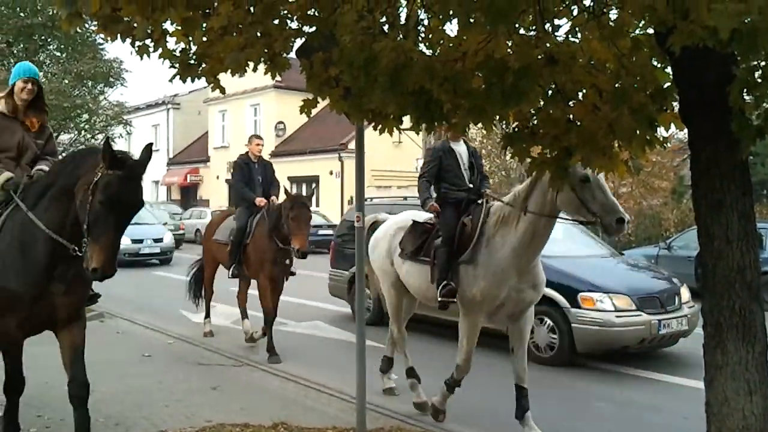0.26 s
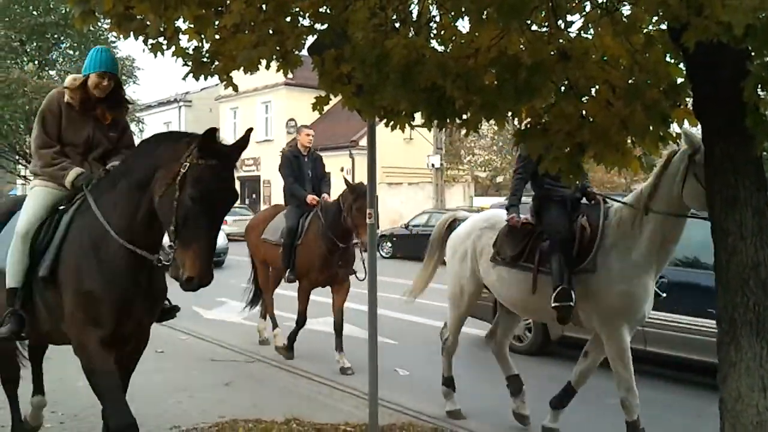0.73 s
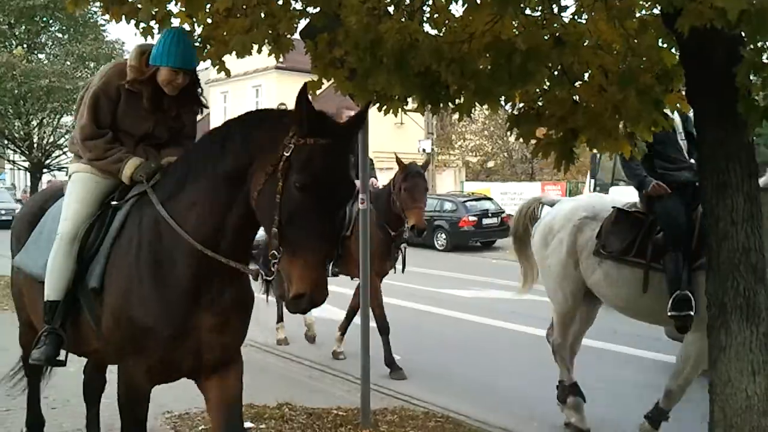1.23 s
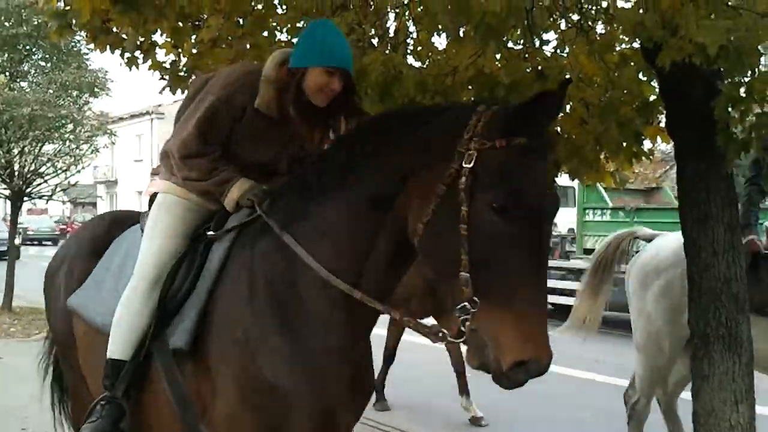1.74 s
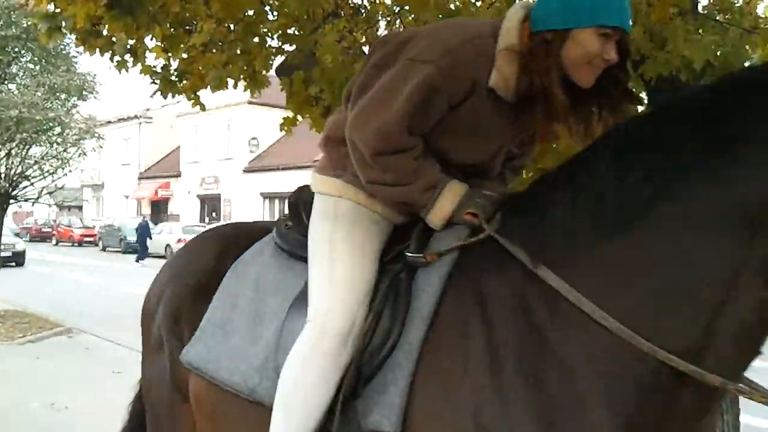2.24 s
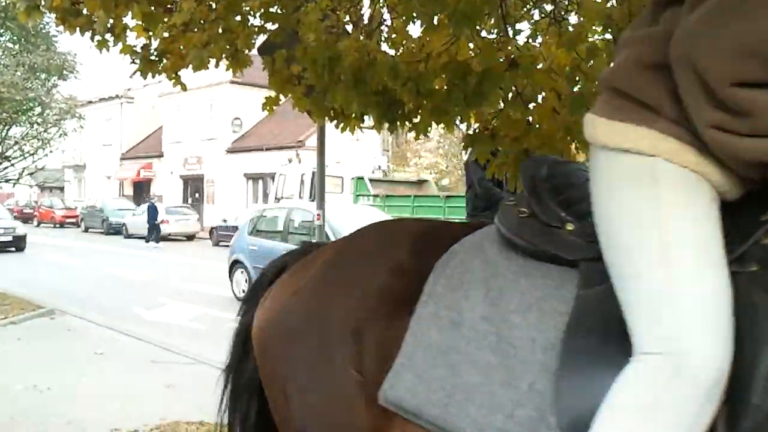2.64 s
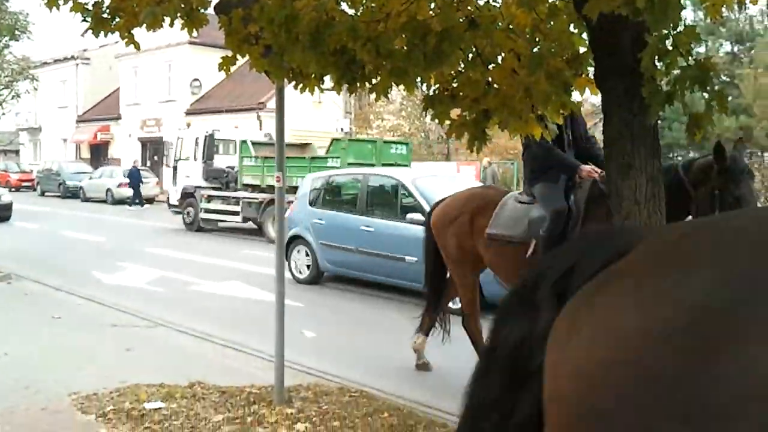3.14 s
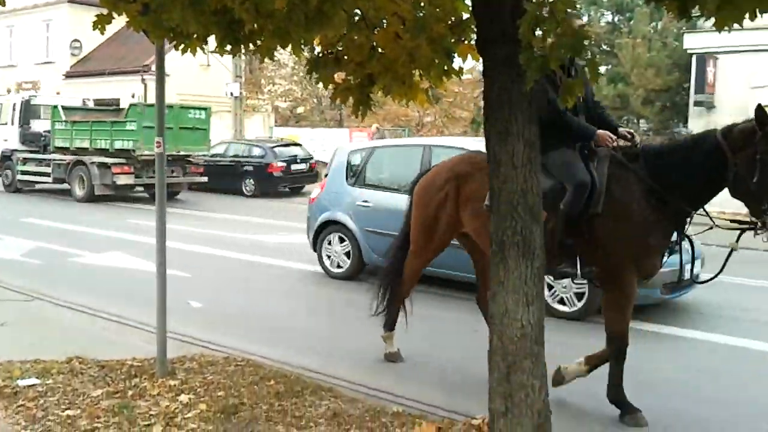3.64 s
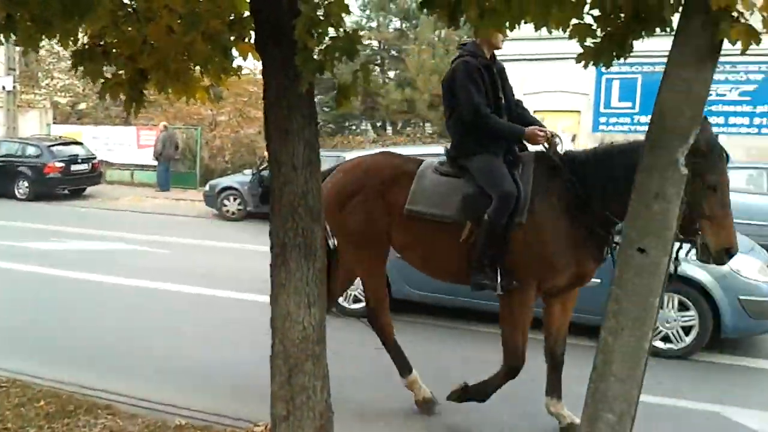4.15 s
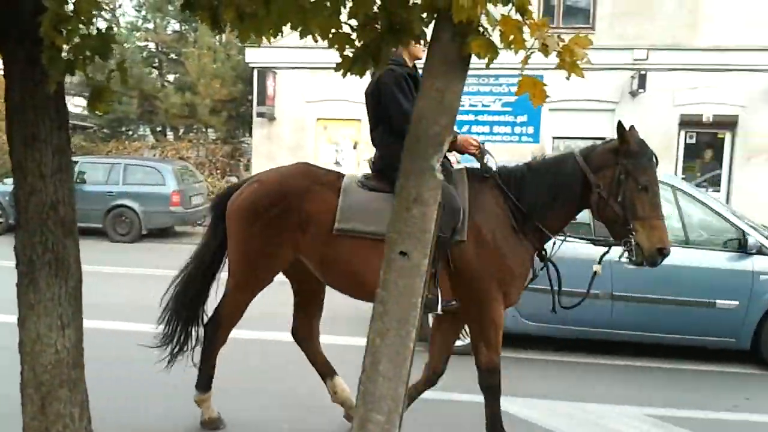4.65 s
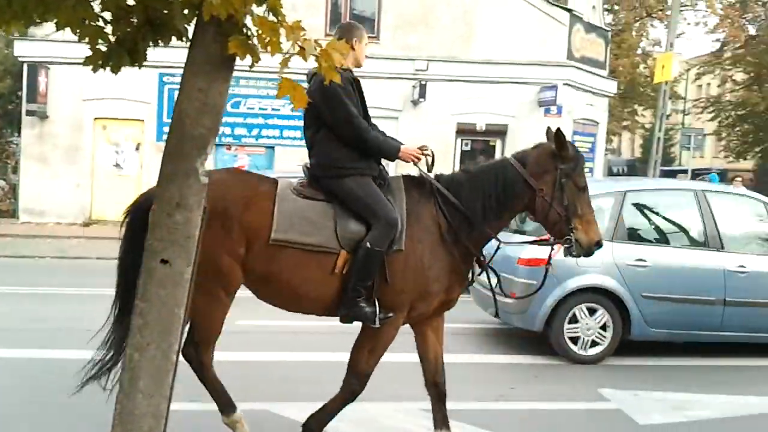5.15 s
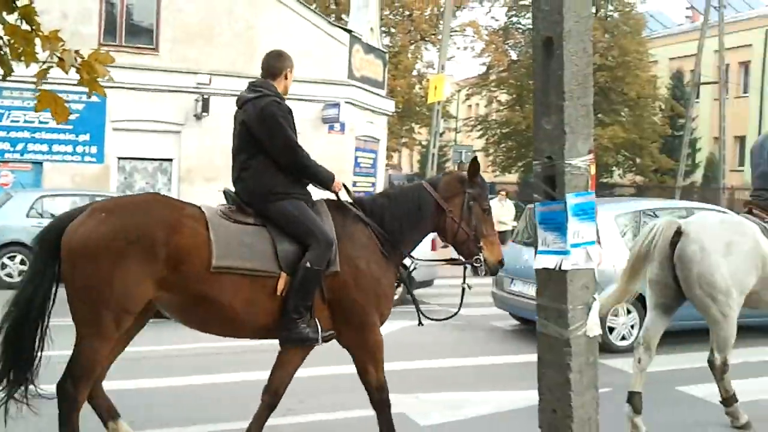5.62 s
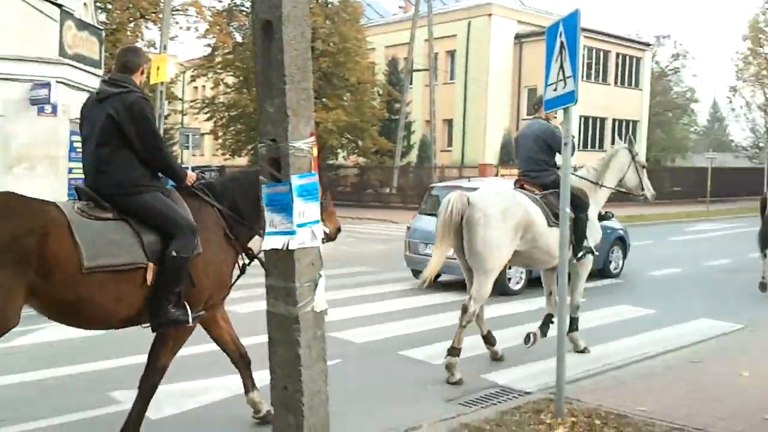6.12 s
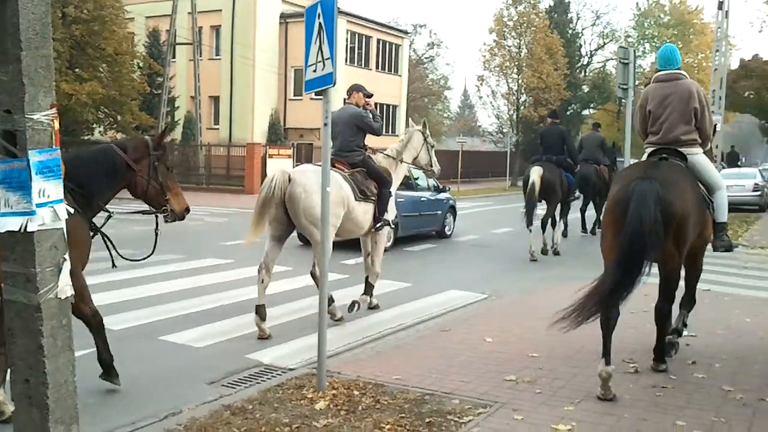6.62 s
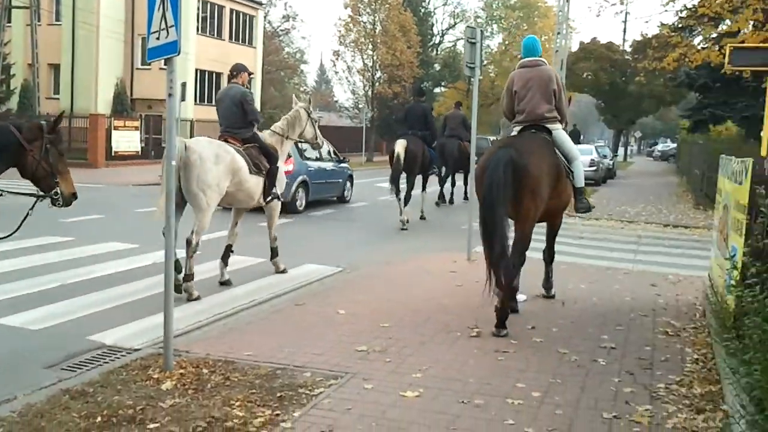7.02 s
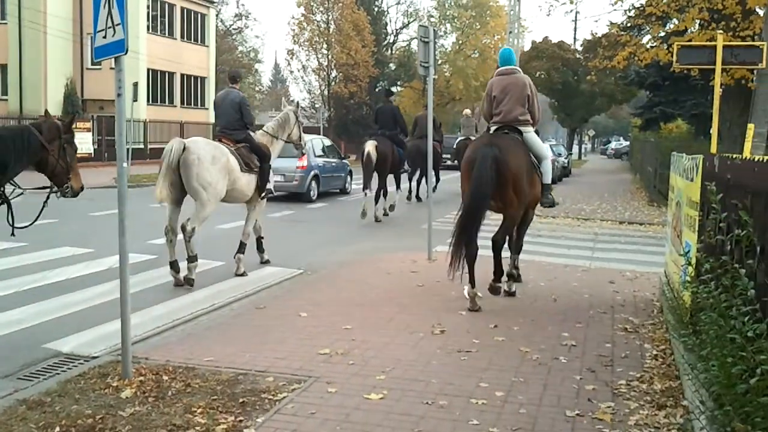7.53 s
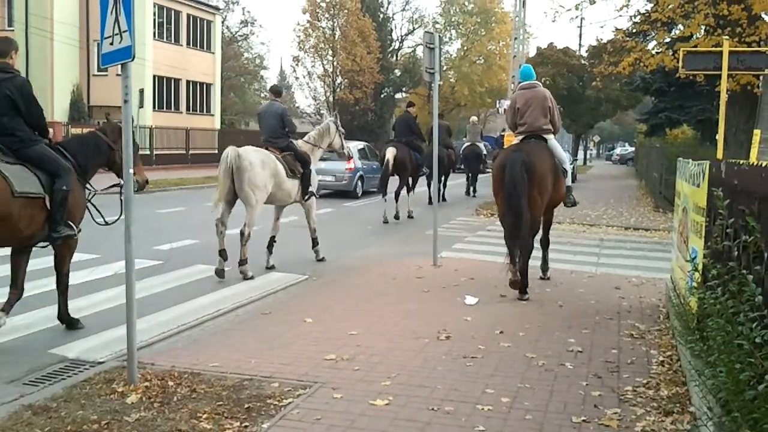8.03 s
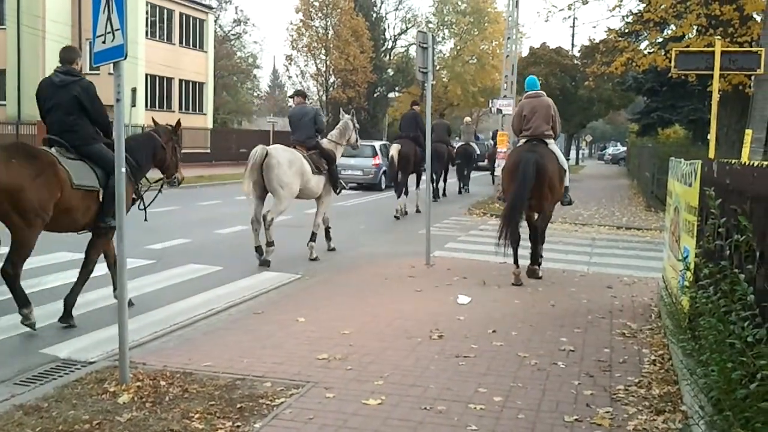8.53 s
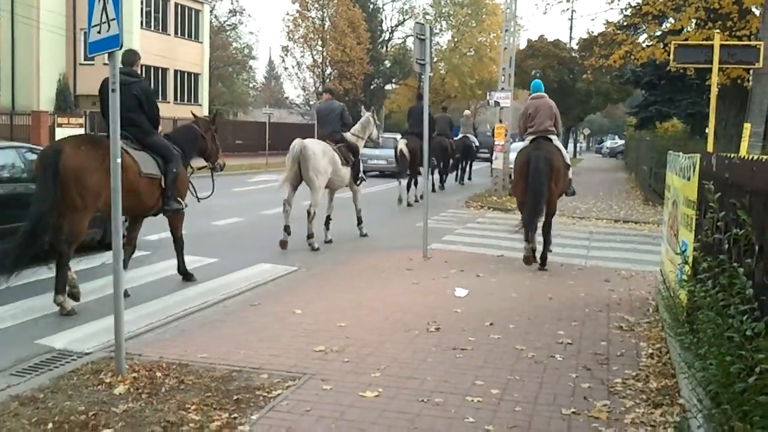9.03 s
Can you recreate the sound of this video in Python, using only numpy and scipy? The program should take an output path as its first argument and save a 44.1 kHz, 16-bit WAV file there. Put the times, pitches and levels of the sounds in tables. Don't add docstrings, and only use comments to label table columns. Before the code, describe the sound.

Several shod horses clop unevenly along a paved town street, close at first, then thinning into the distance over a low rumble of traffic.

```python
import sys
import numpy as np
from scipy import signal
from scipy.fft import rfft, irfft, next_fast_len
from scipy.io import wavfile
from scipy.ndimage import uniform_filter1d

SR = 44100
rng = np.random.default_rng(int(sys.argv[2]) if len(sys.argv) > 2 else 0)


def ratio_of_db(decibels):
    return 10 ** (np.asarray(decibels, float) / 20)


def output_pcm(signal):
    pcm = np.clip(np.atleast_2d(signal).T, -1, 1) * 32767
    wavfile.write(sys.argv[1], SR, np.round(pcm).astype(np.int16))


N = 408807
TIME = np.arange(N) / SR


def in_time(rows):
    s, *columns = np.transpose(rows)
    return [np.interp(TIME, s, c) for c in columns]


def band(x, low_hz, high_hz, order=2):
    return signal.sosfilt(signal.butter(order, [low_hz, high_hz], "band", fs=SR, output="sos"), x)


def steep_low(x, edge_hz):
    return signal.sosfilt(signal.butter(9, edge_hz, fs=SR, output="sos"), x)


def peak_one(rows):
    return rows / np.max(np.abs(rows), axis=1, keepdims=True)


def drift(rate_hz):
    hop = 100
    r = np.exp(-2 * np.pi * rate_hz * hop / SR)
    white = rng.standard_normal(N // hop + 1002)
    slow = signal.lfilter([1], [1, -2 * r, r * r], white)[1000:]
    return np.interp(np.arange(N) / hop, np.arange(len(slow)), slow / slow.std())


def place(times_s, rows):
    out = np.zeros(N + rows.shape[1])
    for s, row in zip(times_s, rows):
        out[round(s * SR):][:len(row)] += row
    return out[:N]


def ring(x, hz, t60_s):
    r = ratio_of_db(-60 / (t60_s * SR))
    w = 2 * np.pi * hz / SR
    return signal.lfilter([0, np.sin(w)], [1, -2 * r * np.cos(w), r * r], x)


def ragged(count, t60_s):
    t = np.arange(round(.08 * SR)) / SR
    luck = np.array([rng.standard_normal((2, len(t))) for _ in range(count)])
    clumps = uniform_filter1d(luck[:, 1], size=60, axis=1) * np.sqrt(60)
    return luck[:, 0] * ratio_of_db(6.7 * clumps) * np.exp(-np.log(1000) * t / t60_s)


def coloured_noise(spectrum, patchy_db):
    size = next_fast_len(N)
    hz = np.fft.rfftfreq(size, 1 / SR)[1:]
    at_hz, level_db = np.transpose(spectrum)
    shape = ratio_of_db(np.interp(np.log(hz), np.log(at_hz), level_db, left=-90, right=-90))
    white = rfft(rng.standard_normal(size))[1:] * shape
    octave = np.log2(hz / at_hz[0])
    out = 0
    for centre in np.arange(0, np.log2(at_hz[-1] / at_hz[0]) + 1):
        part = np.cos(np.pi / 2 * np.clip(octave - centre, -1, 1)) ** 2
        out = out + irfft(np.append(0, white * part), size)[:N] * ratio_of_db(patchy_db * drift(6))
    return out / out.std()


def traffic():
    # frequency in Hz, level in dB per Hz
    rumble = [(13, -32.5), (22, -9), (38, 0.5), (59, -1.5), (97, -3.5), (215, -9.5), (400, -19), (520, -49),
              (880, -120)]
    drone = [(180, -11), (300, 1.5), (512, 2), (650, -3.5), (939, -3), (1400, -16), (1820, -52.5),
             (3080, -120)]
    tyres = [(650, -16.5), (1100, 2), (1660, 0.5), (2100, -8), (2570, -7), (3050, -20), (3960, -51),
             (6710, -120)]
    hiss = [(2900, 1), (3400, 0.5), (3900, -3), (4400, -1.4), (5500, -3), (6600, -5), (7600, -6), (8300, 8),
            (8800, -6.5)]
    # steady level in dB, share of the passing roar in dB, patchiness in dB
    layers = [
        (-30.5, -8.5, 1.1),
        (-40.5, 0.5, 1.96),
        (-53, 0.5, 1.04),
        (-64, -29, 1.07),
    ]
    # time abreast in s, time to draw half away in s, tyre roar in dB
    passes = [
        (0.952, 0.23, -46),
        (2.2, 0.57, -50.5),
        (4.3, 0.33, -44.5),
        (5.95, 0.41, -41),
        (7.601, 1.1, -45.5),
        (9.05, 0.18, -48.5),
    ]
    # centre in s, half length in s, depth in dB
    dips = [
        (1.45, 0.19, -2),
        (3.202, 0.29, -3.5),
        (8.693, 0.13, -2.5),
    ]
    roar = sum(ratio_of_db(db) ** 2 / (1 + ((TIME - s) / half_s) ** 2) for s, half_s, db in passes)
    dip_gain = ratio_of_db(sum(db * np.exp(-((TIME - s) / half_s) ** 2) for s, half_s, db in dips))
    out = 0
    for colour, (steady_db, share_db, patchy_db) in zip((rumble, drone, tyres, hiss), layers):
        level = np.sqrt(ratio_of_db(steady_db) ** 2 + ratio_of_db(share_db) ** 2 * roar)
        out = out + level * coloured_noise(colour, patchy_db)
    return dip_gain * out


def near_car():
    # frequency in Hz, level in dB per Hz
    fan_spectrum = [(950, -13.5), (1150, 0), (1350, -8), (1550, -14.5), (1680, -4), (1850, -19.5),
                    (2500, -15.5), (2900, -26)]
    spray_spectrum = [(4000, -22), (4400, 1.5), (5500, -0.5), (6500, -13)]
    # time abreast in s, half length in s, fan in dB, spray in dB
    abreast = [
        (3.647, 0.57, -44, -88),
        (4.355, 0.35, -46, -74),
        (5.897, 0.3, -60, -70.5),
        (9.0, 0.3, -63, -77),
    ]
    s, half_s, fan_db, spray_db = np.transpose(abreast)[:, :, None]
    close = np.exp(-((TIME - s) / half_s) ** 2)
    fan = np.sqrt(np.sum(ratio_of_db(fan_db) ** 2 * close, axis=0))
    spray = np.sqrt(np.sum(ratio_of_db(spray_db) ** 2 * close, axis=0))
    return fan * coloured_noise(fan_spectrum, patchy_db=3.0) + spray * coloured_noise(spray_spectrum, patchy_db=0.0)


def bumps():
    # time in s, peak in dB, pitch in Hz, t60 in s
    seams = [
        (7.171, -21.5, 123.5, 0.18),
    ]
    s, peak_db, hz, t60_s = np.transpose(seams)[:, :, None]
    t = np.arange(round(.3 * SR)) / SR
    modes = np.sin(2 * np.pi * hz * t) + 0.7 * np.sin(2 * np.pi * 1.1 * hz * t)
    knock = modes * (1 - np.exp(-t / .012)) * np.exp(-np.log(1000) * t / t60_s)
    return place(s[:, 0], ratio_of_db(peak_db) * peak_one(knock))


def engine(rows, orders, wobble_db):
    hz, level_db, *load_db = in_time(rows)
    phase = 2 * np.pi * np.cumsum(hz * (1 + 0.002934 * drift(4.42))) / SR
    fade_in = np.clip((TIME - rows[0][0]) / 0.046, 0, 1)
    fade_out = np.clip((rows[-1][0] + 0.056 - TIME) / 0.054, 0, 1)
    tones = 0
    for k, db in orders:
        lift_db = (k > 1) * sum(load_db)
        order_db = level_db + db + lift_db + wobble_db * np.sqrt(k) * drift(10.0)
        tones = tones + ratio_of_db(order_db) * np.sin(k * phase + k)
    return np.sqrt(2) * fade_in * fade_out * tones


def lorry():
    # time in s, gear whine in Hz, level in dB
    easing = [
        (0, 202.5, -40.5),
        (.5, 198.2, -39),
        (.9, 189.9, -33),
        (1.15, 191.4, -41),
        (1.4, 194.7, -39.5),
        (1.8, 199, -37.5),
        (2.2, 202.2, -38),
        (2.7, 196.3, -43.5),
    ]
    # multiple of the whine, level in dB
    gears = [(1, -7), (1.085, -3)]
    # frequency in Hz, level in dB per Hz
    boom = [(160, -31), (190, 4.5), (215, 4), (260, 0.5), (310, 1.5)]
    whine = engine(easing, gears, wobble_db=3.5)
    passing = np.clip((easing[-1][0] + 0.39 - TIME) / 0.33, 0, 1)
    return whine + passing * ratio_of_db(in_time(easing)[1]) * coloured_noise(boom, patchy_db=-3.0)


def cars():
    # time in s, firing rate in Hz, level in dB, load lift of the upper orders in dB
    pulling = [(2.7, 41.3, -35, -11), (3.05, 44.6, -20.5, -7.5), (3.7, 49.15, -23.5, 2.5),
               (4.3, 53.16, -24, 1.5), (4.8, 57.12, -22.5, -6), (5.2, 60.3, -25, 2.5), (5.5, 62.8, -24, -9),
               (5.66, 65, -39, -2), (6.05, 68.6, -29.5, -9.5), (6.43, 72.4, -34.5, -10),
               (6.52, 73.2, -25.5, -17), (7.4, 82, -30.5, -9.5), (8.0, 88.84, -31.5, -13),
               (8.32, 91.3, -31, -11), (8.55, 93.25, -25.5, -3.5), (8.82, 96.2, -34, -4),
               (9.05, 98.3, -30.5, -3), (9.27, 100.9, -25.5, -7)]
    creeping = [(1.6, 36.75, -41, 1), (1.95, 37.9, -33, 2), (2.6, 39.58, -28, -3.5),
                (3.1, 40.46, -24.5, -9.5), (4.2, 41.9, -38, -2), (5, 45.1, -33.5, -0.5),
                (5.45, 48.07, -31.5, -1.5), (6.1, 45.63, -31.5, -0.5), (6.6, 46.15, -31, 4.5),
                (7.1, 47.73, -34, 4.5), (7.7, 50.3, -29.5, 1), (8.2, 50.72, -40, 0),
                (9.27, 50.24, -36.5, 8.5)]
    # time in s, firing rate in Hz, level in dB
    slowing = [
        (0.0, 47.35, -31.5),
        (0.35, 46.34, -24.5),
        (0.95, 46.72, -31),
        (1.1, 46.4, -21),
        (1.5, 45.85, -22),
        (1.7, 44.84, -35.5),
        (1.95, 44.9, -33.5),
        (2.25, 44.2, -44),
    ]
    idling = [
        (4.6, 38.5, -34),
        (5.2, 37.91, -43),
        (5.5, 36.48, -41),
        (5.9, 35.6, -28.5),
        (6.36, 36.83, -28.5),
        (7.42, 38.27, -31.5),
        (7.98, 39.03, -26.5),
        (8.7, 39.88, -31),
        (9.27, 41.5, -30.5),
    ]
    # multiple of the firing rate, level in dB
    pulling_orders = [(1, 0), (2, -14), (3, -21.5), (5, -23)]
    creeping_orders = [(1, 0), (2, -14.5), (4, -11.5), (5, -17.5), (7, -22)]
    out = engine(pulling, pulling_orders, wobble_db=0.6)
    out += engine(slowing, [(1, 0)], wobble_db=0.3)
    out += engine(creeping, creeping_orders, wobble_db=-0.65)
    out += engine(idling, [(1, 0.5), (2, -15.5)], wobble_db=3.3)
    return out


def street(x):
    # delay in s, level in dB
    echoes = [(.0035, -24), (.007, -28), (.017, -21), (.031, -22), (.052, -27), (.083, -25)]
    tail = np.zeros(round(.12 * SR))
    for delay_s, db in echoes:
        smear = rng.standard_normal(90) * np.hanning(90)
        tail[round(delay_s * SR):][:90] += ratio_of_db(db - 4.0) * smear
    return signal.fftconvolve(x, band(tail, 210, 2800))[:N]


def grit():
    # time in s, peak in dB, shoe ring in Hz, lower edge in dB
    scrapes = [(0.098, -54, 4470, 8), (0.1186, -45, 5600, 18.5), (0.128, -53, 5540, 6),
               (0.18, -56, 3650, 4), (0.377, -47, 4300, 10), (0.392, -40, 6440, -14),
               (0.403, -51, 4280, 9), (0.6338, -41.5, 4250, 6), (0.643, -54, 7000, 8),
               (0.914, -46, 5800, -6), (0.921, -45, 4700, 3), (1.1596, -50.5, 3870, -2.5),
               (1.435, -48, 3610, 6), (1.4504, -45, 5310, 4), (1.454, -44, 2570, 10.5),
               (1.4645, -45, 2450, 4), (1.472, -63, 4500, 6), (1.481, -50, 3930, -10),
               (1.673, -43, 3700, -10), (1.84, -55, 4500, 18), (1.8951, -54, 3920, 5),
               (1.947, -53, 4380, -4), (2.0066, -52, 6100, 0), (2.192, -44, 3687, -14),
               (2.4593, -49, 4270, -5.5), (2.4915, -42.5, 5530, -13), (2.509, -49, 4220, -7),
               (2.705, -49, 4536, -3), (2.957, -48.5, 4200, -1), (3.023, -48, 3564, -4),
               (3.211, -51, 3850, 10), (3.445, -52.5, 4050, 6), (3.546, -48.5, 4400, -7),
               (3.7065, -52, 3646, 3), (3.9237, -51, 5530, 7), (5.016, -62, 3820, 27),
               (5.2473, -58, 3100, 11), (5.5952, -55, 5900, 1), (5.6303, -46.5, 3200, 5),
                   (5.786, -51, 5906, 4), (6.5906, -50, 3050, 12), (6.7084, -44, 3100, 9),
                   (6.926, -53, 2950, 13), (6.987, -46, 2940, 7), (7.151, -57, 3300, 9),
                   (7.373, -42, 3110, 0), (7.55, -56, 3100, 9), (7.763, -44, 3370, 7),
                   (7.779, -48, 3212, 3), (8.1369, -44.5, 3314, 5), (8.244, -57, 4200, 12),
                   (8.308, -50, 3400, 6), (8.317, -54, 4500, 11), (8.3869, -62, 2900, 18),
                   (8.514, -48, 3020, 11), (8.684, -55, 4600, -2), (8.802, -49, 3138, 8),
                   (9.023, -57, 6200, -3), (9.048, -52, 7225, -2), (9.2262, -53, 7340, -11)]
    s, peak_db, hz, lower_db = np.transpose(scrapes)[:, :, None]
    grains = ragged(len(s), t60_s=.038)
    t = np.arange(grains.shape[1]) / SR
    grains = grains * (1 - np.exp(-t / .0008))
    shoe = np.array([ring(row, f, t60_s=.007) for row, f in zip(grains, hz[:, 0])])
    bright = peak_one(peak_one(band(grains, 3900, 7800)) + ratio_of_db(3.0) * peak_one(shoe))
    first_tick = peak_one(band(grains * np.exp(-t / 0.0013), 3300, 8300))
    bright += ratio_of_db(-5) * first_tick
    lower = peak_one(steep_low(band(grains, 1500, 5700), 2830))
    return place(s[:, 0], ratio_of_db(peak_db + 0.5) * (bright + ratio_of_db(lower_db + 2.0) * lower))


def hooves():
    # time in s, peak in dB,
    # hollow pitch in Hz, clack in dB re peak
    heel_falls = [(.041, -17, 880, -27), (.361, -20, 1045, -26), (0.403, -18, 940, -22),
                  (.624, -15.5, 990, -20), (0.821, -23.5, 1070, -25), (0.9, -28, 1060, -23),
                  (1.409, -21.5, 850, -24), (1.621, -25.5, 920, -27), (1.701, -23, 890, -20),
                  (2.125, -20.5, 1050, -9), (2.238, -17.5, 1030, -12), (2.311, -17.5, 744, -38),
                  (2.39, -18.5, 880, -24), (2.832, -17, 440, -9.5), (4.07, -20.5, 1120, -27),
                  (4.575, -20.5, 930, -9), (4.637, -21, 820, -10), (5.11, -23, 990, -30),
                  (6.634, -23, 910, -23), (8.303, -22, 1073, -27)]
    flat_falls = [(0.097, -20, 965, -27), (1.224, -24, 866, -23), (1.333, -22, 1230, -3.5),
                  (1.486, -16, 920, -37), (1.728, -24, 757, -9), (1.888, -24.5, 1070, -30),
                  (2.492, -14, 660, -35), (2.51, -11, 930, -36), (2.587, -18, 860, -22),
                  (2.955, -15, 721, -26), (3.212, -19.5, 755, -21), (3.279, -26.5, 900, -23),
                  (3.543, -16, 990, -29), (3.706, -22, 825, -9), (4.423, -22.5, 606, -7),
                  (4.717, -20.5, 875, -12), (6.674, -27, 1010, -5), (7.376, -21.5, 694.8, -8),
                  (8.319, -19.5, 779.6, -11), (8.604, -25.5, 1099, -28), (8.804, -25, 886, -14),
                  (8.91, -27, 822, -11)]
    cupped_falls = [(.121, -15, 706, -23), (.392, -10, 954, -18), (.394, -13.5, 582, -36),
                    (.432, -19.5, 810, -33), (.596, -24.5, 696, -1.5), (1.153, -17.5, 864, -10),
                    (1.433, -15.5, 748.4, -18), (1.949, -12, 717, -38), (2.248, -18, 965, -32),
                    (2.702, -14.5, 750, -10), (2.753, -19.5, 960, -11), (3.022, -16, 950, -18),
                    (3.319, -23.5, 1360, -10), (3.443, -16.5, 745, -20), (5.596, -17, 854, -13),
                    (5.773, -21, 1000, -15), (6.099, -24, 970, -12), (6.174, -21, 634, -8),
                    (6.933, -21, 1110, -9), (7.151, -25, 1021, -5), (9.22, -23.5, 920, -20)]
    toes = [(.115, -18, 1006, -14), (.127, -20, 770, -22), (.324, -28, 1260, -1), (0.376, -30, 930, -4),
            (.646, -29.5, 905, -34), (1.449, -27.5, 1220, 1.5), (1.938, -25, 970, -22),
            (2.282, -23, 915, -26), (2.334, -32, 1470, 5), (2.611, -20.5, 1486, -8), (.479, -41, 965, -19),
            (0.664, -29, 1130, -8), (.718, -31, 1130, -10), (1.026, -27, 1045, -11), (2.08, -29, 810, -5),
            (2.821, -27.5, 1252, -3.5), (7.555, -28.5, 981.8, 0.5), (8.13, -28, 950, -14),
            (8.385, -33, 1250, 7.5), (8.553, -26.5, 953, -9)]
    # thud in dB re peak, ring t60 in s
    landings = [
        (-5, .015),
        (-13, .016),
        (-17, .017),
        (-21, .02),
    ]
    # time in s, peak in dB, hollow pitch in Hz, clack in dB re peak,
    # ring t60 in s
    hard_falls = [(0.629, -27, 1100, -11, 0.013), (0.6342, -17, 990, -7, .011),
                  (0.639, -24, 1220, 3.5, 0.0081), (0.9134, -12, 886, -12.5, 0.016),
                  (.9197, -27, 985, -8, 0.013), (1.668, -22, 1148, -18, 0.01),
                  (1.6733, -10, 850, -17, 0.0079), (2.007, -11.5, 914, -13.5, .017),
                  (2.1912, -8, 711, -21, 0.011), (2.4615, -8.5, 736, -32, 0.0089),
                  (2.469, -24, 786, -19, .012), (2.6135, -10, 530, -15.5, 0.0054),
                  (3.595, -18, 780, -22, 0.013), (3.5995, -11.5, 780, -31, 0.0064),
                  (3.818, -7.5, 770, -16, 0.0053), (3.9275, -18.5, 780, -26, 0.023),
                  (4.102, -12.5, 910, -34, 0.023), (4.332, -14, 795, -22, 0.0074),
                  (4.3383, -27, 1270, -13, 0.0091), (4.8443, -7.5, 803, -18, 0.008),
                  (4.849, -24, 804, -15, 0.011), (5.130, -23, 955, -11, 0.018),
                  (5.136, -12, 840, -34, 0.0074), (6.7022, -15, 1010, -25, 0.012),
                  (6.708, -30, 1099, 3, 0.0065), (7.7772, -22, 903, -12, 0.0082),
                  (7.7799, -17, 790, -21, 0.0086), (5.24, -30, 790, -17, 0.015),
                  (5.4688, -17.5, 650, -30, 0.033), (5.654, -31, 890, -14, .018),
                  (5.709, -27, 921, -5, 0.01), (4.9355, -17.5, 690, -28, 0.019),
                  (7.83, -24.5, 730, -13, 0.029), (8.683, -41, 846, -10, 0.024),
                  (8.695, -30, 1002, -8, 0.026), (8.884, -27, 760, -14, 0.018),
                  (.415, -26, 850, -13, 0.026), (0.759, -39, 1100, -12, 0.022),
                  (.842, -38, 1110, -14, .025), (.955, -38, 1310, -11, .04)]
    # time in s, peak in dB, hollow pitch in Hz
    faint_taps = [(0.057, -29, 900), (.072, -27, 620), (.136, -31, 710), (.157, -31, 800), (.457, -34, 900),
                  (.676, -30, 1110), (1.304, -32, 1150), (1.47, -28, 704), (1.502, -32, 950),
                  (1.518, -33, 850), (1.535, -32, 1060), (1.76, -33, 800), (1.842, -26, 1350),
                  (1.966, -26, 700), (2.135, -27, 1050), (2.182, -27, 940), (2.204, -25, 700),
                  (2.326, -28, 900), (2.401, -29, 900), (2.801, -27, 970), (2.866, -36, 850), (3.1, -28, 830),
                  (3.416, -28, 1010), (3.496, -30, 970), (3.688, -31, 1052), (8.301, -29, 450),
                  (8.917, -35, 880)]
    hard_thud_db = -11.5
    tap_clack_db, tap_thud_db, tap_t60_s = -19.5, -25, 0.019

    blows = []
    for rows, how in zip((heel_falls, flat_falls, cupped_falls, toes), landings):
        blows += [row + how for row in rows]
    blows += [row[:4] + (hard_thud_db, row[4]) for row in hard_falls]
    blows += [row + (tap_clack_db, tap_thud_db, tap_t60_s) for row in faint_taps]
    s, peak_db, hz, clack_db, thud_db, t60_s = np.transpose(blows)[:, :, None]

    t = np.arange(round(.08 * SR)) / SR
    luck = np.array([rng.standard_normal(len(t) + 2) for _ in s])
    swell = (1 - np.exp(-t / (0.072 * t60_s))) ** 2
    decay = np.exp(-np.log(1000) * t / np.clip(t60_s, .006, .09))
    spread = 1.142 + 0.17 * luck[:, :1]
    hollow = np.sin(2 * np.pi * hz * t)
    above = ratio_of_db(-16.5) * np.sin(2 * np.pi * hz * spread * t)
    below = ratio_of_db(-8 + 2.5 * luck[:, 1:2]) * np.sin(2 * np.pi * hz / spread * t)
    clop = peak_one(-(hollow + above + below) * swell * decay)
    thud = peak_one(-np.sin(2 * np.pi * 480 * t) * swell * np.exp(-t / 0.0016))
    burst = luck[:, 2:] * (1 - np.exp(-t / .0012)) ** 2 * np.exp(-t / .0025)
    clack = peak_one(band(burst, 560, 1900))
    drag = ratio_of_db(-14) * peak_one(band(ragged(len(s), t60_s=0.11), 500, 2000))
    blow = clop + drag + ratio_of_db(thud_db + 1.0) * thud + ratio_of_db(clack_db + 4.5) * clack
    return steep_low(place(s[:, 0], ratio_of_db(peak_db - 4.0) * blow), 2820)


def scene():
    steps = hooves() + grit()
    echoes = ratio_of_db(-7) * street(steps)
    return (steps + echoes + cars() + lorry() + bumps() + near_car() + traffic())[None]


def roll_off(x):
    return signal.sosfilt(signal.butter(12, 8850, fs=SR, output="sos"), x)


def record(dry):
    sos = signal.cheby2(12, 60, 8850, fs=SR, output="sos")
    settled = signal.sosfilt_zi(sos) * dry[0, 0]
    cut = signal.sosfilt(sos, dry[0], zi=settled)[0][None]
    return roll_off(cut + .0053)


dry = scene()
out = record(dry)
output_pcm(out)
```